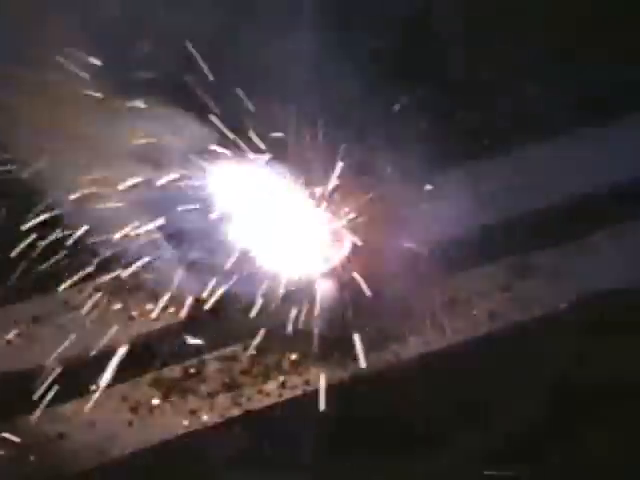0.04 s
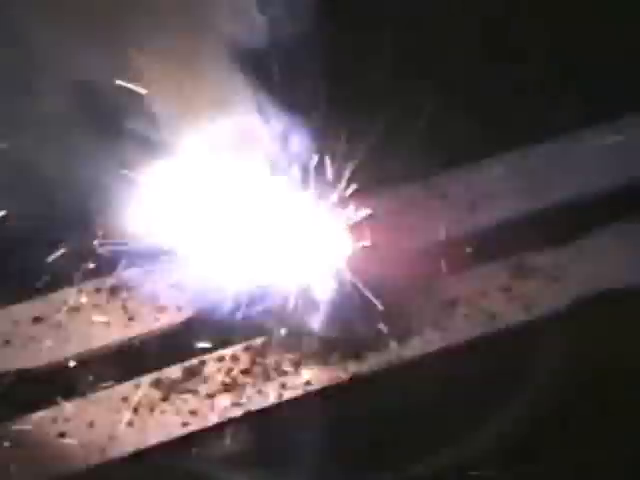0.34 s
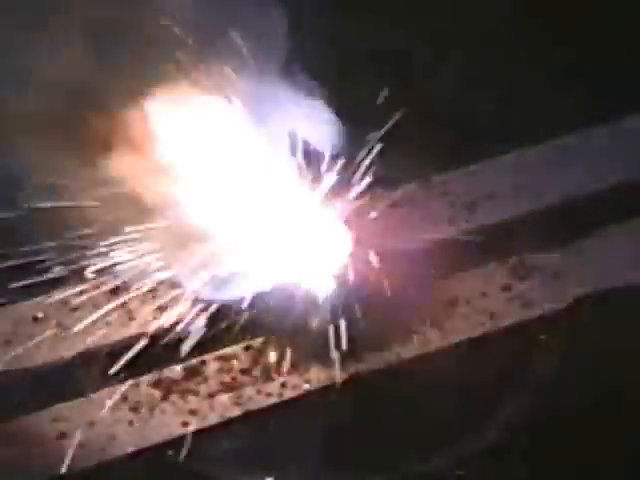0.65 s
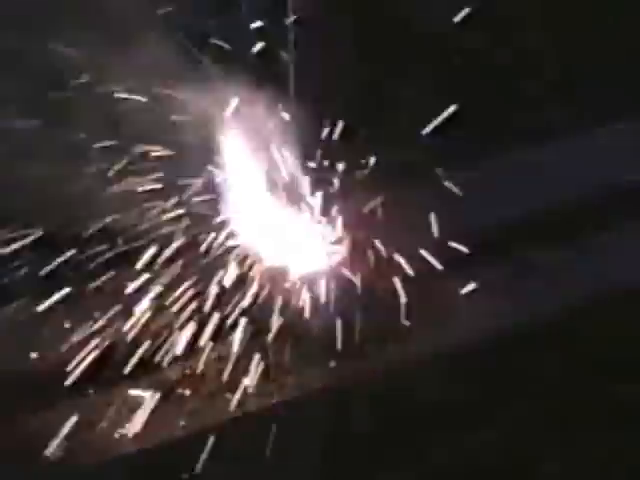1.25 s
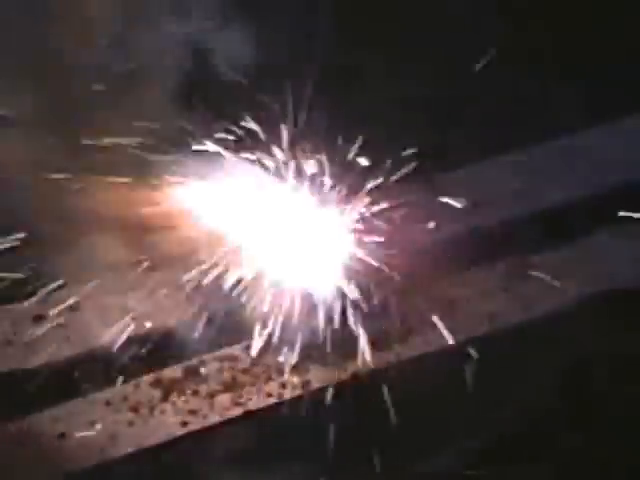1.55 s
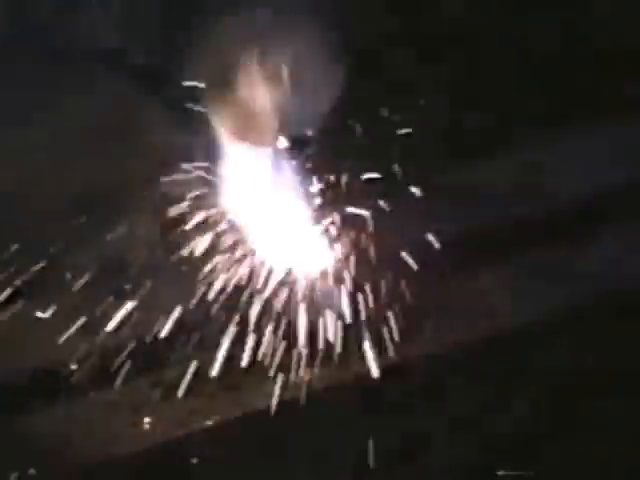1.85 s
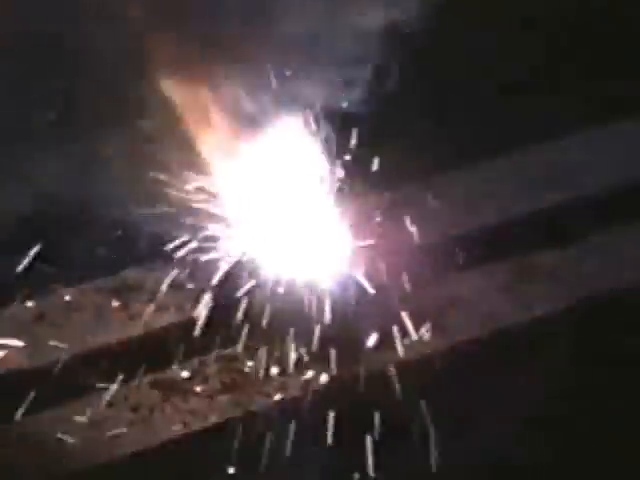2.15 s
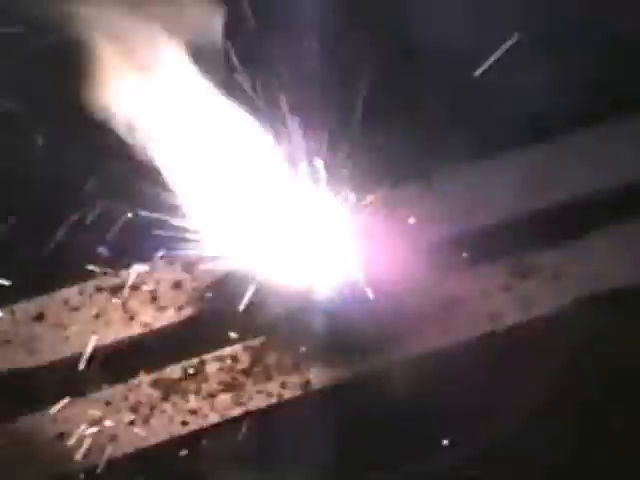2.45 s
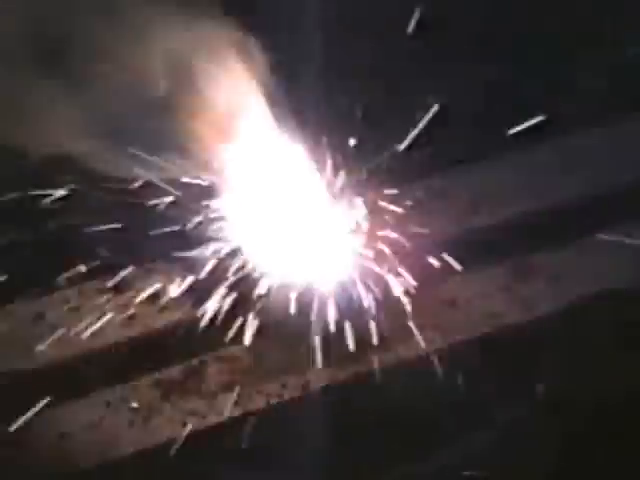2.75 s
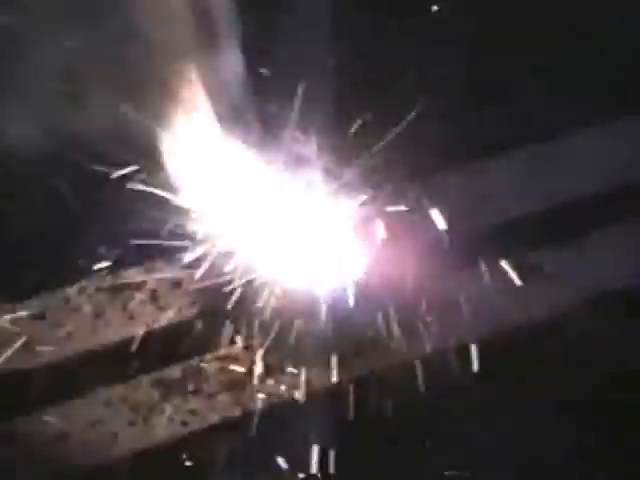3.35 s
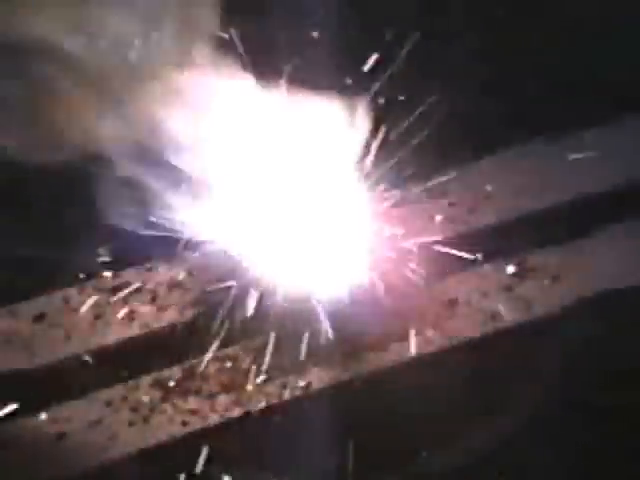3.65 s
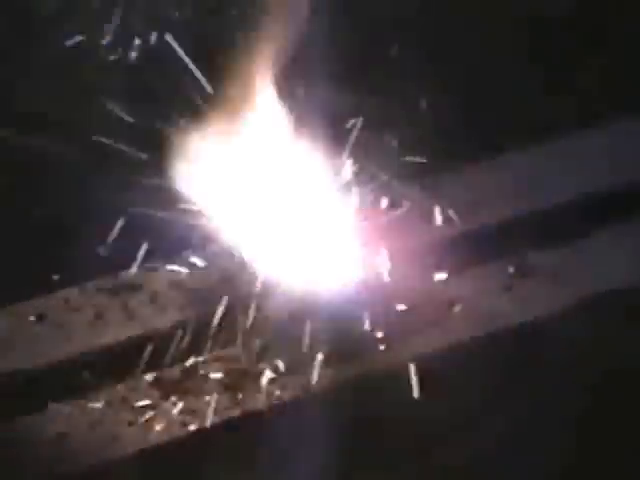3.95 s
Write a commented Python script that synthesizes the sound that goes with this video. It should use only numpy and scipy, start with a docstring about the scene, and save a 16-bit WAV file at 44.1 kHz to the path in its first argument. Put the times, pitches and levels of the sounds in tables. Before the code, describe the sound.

Burning thermite hisses and rushes close by outdoors, surging unevenly over a fine crackle of sparks. Tiny squeaky pops come at about 0.6, 1.1 and 1.3 seconds, and the melt gives a few brief gulps. Sharp spurts of hiss recur from 1 second, strongest near 2.8 and 3.2. The hiss grows louder and swishes toward 4 seconds. A faint hum and high whine lie underneath.

```python
"""Outdoors, on a steel rail, thermite burns. Gas leaves the melt in uneven surges: a midrange rush, a broad
hiss and sharp spurts from narrow vents. Sparks crackle, bubbles gulp in the melt and a few gas pockets burst
with a squeak. The hiss swishes as the flame leans; rails colour it and nearby surfaces echo. A camcorder close
by adds its hum and whine, and overloads on the loudest pops."""
import sys
import numpy as np
from scipy import signal
from scipy.fft import rfft, irfft
from scipy.io import wavfile

SR = 44100
rng = np.random.default_rng(int(sys.argv[2]) if len(sys.argv) > 2 else 0)


def generate_wav(signal):
    """Clip the signal to [-1, 1] and save it as 16-bit WAV at the path in sys.argv[1]."""
    frames = np.transpose(np.atleast_2d(signal))
    scaled = np.clip(frames, -1, 1) * 32767
    pcm = np.round(scaled).astype(np.int16)
    wavfile.write(sys.argv[1], SR, pcm)


N = 176400


def from_db(db):
    """Decibels to gain."""
    return 10 ** (np.asarray(db) / 20)


def unit_rms(x):
    """Scale to an rms of 1."""
    return x / np.sqrt(np.mean(x ** 2) + 1e-20)


def in_time(rows):
    """Rows of (seconds, value), interpolated at every sample."""
    return np.interp(np.arange(N) / SR, *np.transpose(rows))


def at_hz(rows, hz):
    """Rows of (Hz, value), interpolated on a log frequency axis."""
    points_hz, values = np.transpose(rows)
    return np.interp(np.log(hz), np.log(points_hz), values)


def bin_hz():
    """Frequencies of a full-length spectrum."""
    return np.maximum(np.arange(N // 2 + 1) * SR / N, 1)


def shaped_noise(spectrum):
    """Unit-rms noise shaped by rows of (Hz, dB)."""
    return unit_rms(irfft(rfft(rng.standard_normal(N)) * from_db(at_hz(spectrum, bin_hz())), N))


def drift(rate_hz):
    """Smooth random motion, rms about 1."""
    hop, settle = 40, 2000
    pole = np.exp(-2 * np.pi * rate_hz * hop / SR)
    white = rng.standard_normal(N // hop + settle + 2)
    slow = signal.lfilter([1], [1, -2 * pole, pole * pole], white)[settle:]
    return np.interp(np.arange(N) / hop, np.arange(len(slow)), unit_rms(slow))


def resonate(x, hz, width_hz):
    """Two-pole resonance, unity gain at the peak."""
    r = np.exp(-np.pi * width_hz / SR)
    feedback = [1, -(1 + r * r) * np.cos(2 * np.pi * hz / SR), r * r]
    return signal.lfilter(np.array([1, 0, -1]) * (1 - r * r) / 2, feedback, x + 1e-18)


def band_noise(samples, hz, width_hz):
    """Unit-rms noise through two equal resonances."""
    once = resonate(rng.standard_normal(samples), hz, width_hz)
    return unit_rms(resonate(once, hz, width_hz))


def phase_wander(samples, width_hz):
    """Random phase walk that roughens a tone to the given line width."""
    return np.cumsum(rng.standard_normal(samples)) * np.sqrt(2 * np.pi * width_hz / SR)


def delayed(x, lag_s):
    """Fractional delay."""
    n = np.arange(N)
    return np.interp(n - SR * lag_s, n, x)


# Gas surges. Each row: time in seconds, flow level in dB.
GAS_FLOW = [(0.0, -16.5), (0.2, -17.5), (0.31, -16), (0.47, -28.5), (0.51, -12.5), (0.63, -21.5),
            (0.65, -27), (0.71, -21), (0.73, -26), (0.76, -13.5), (0.85, -17.5), (0.88, -27.5), (0.92, -26),
            (0.95, -21), (1.05, -14.5), (1.19, -23.5), (1.32, -11.5), (1.38, -19.5), (1.43, -22),
            (1.47, -15.5), (1.49, -21.5), (1.53, -14), (1.57, -18), (1.65, -10.5), (1.8, -21), (1.89, -14),
            (1.95, -10), (1.99, -22.5), (2.05, -25.5), (2.09, -19.5), (2.1, -24), (2.15, -12.5),
            (2.21, -12.5), (2.24, -18), (2.45, -12.5), (2.54, -21), (2.62, -12), (2.65, -6), (2.67, -13),
            (2.7, -11.5), (2.73, -21), (2.75, -20), (2.82, -8.5), (2.9, -13), (2.99, -13.5), (3.05, -11),
            (3.12, -25.5), (3.152, -20.5), (3.16, -8), (3.24, -8), (3.32, -15), (3.4, -8.5), (3.48, -17.5),
            (3.58, -10.5), (3.66, -12.5), (3.78, -11.5), (3.82, -6), (3.9, -13), (3.94, -4.5), (4.0, -11)]


def gas_flow():
    """Surging, fluttering outflow from the melt, in dB about its mean."""
    mean_db, flutter_db = -14, 0.98
    return in_time(GAS_FLOW) - mean_db + flutter_db * drift(rate_hz=82)


# Hiss spectrum at mean flow. Each row: frequency in Hz, relative density in dB.
HISS_SPECTRUM = [(250,-24),(520,-16.5),(740,-6),(1000,-3),(1700,-2),(2700,-3.5),(4500,-2.5),(6500,0),(8500,-1.1),(10500,-4),(12000,-12),(14000,-16.5),(15500,-27)]
# Coupling of hiss to flow. Each row: frequency in Hz, share of the flow's dB swing.
FLOW_COUPLING = [(400,0.33),(900,0.71),(1800,0.82),(4500,1)]
# Low rush against the rest of the hiss. Each row: time in seconds, gain in dB.
RUSH_GAIN = [(0,-0.5),(.55,0),(1.05,1.5),(1.5,-2),(1.75,0.5),(2.6,-2),(3.05,-1.5),(3.19,-3.5),(3.38,1),(3.58,-1.5),(3.7,1.5),(3.83,-4.5),(4,-2.5)]
# Top treble against the rest of the hiss. Each row: time in seconds, gain in dB.
TREBLE_GAIN = [(0,-2.5),(.24,0),(.35,-2.5),(.78,2),(1.03,0.5),(1.5,1),(2.15,-0.5),(2.45,-3),(2.84,-3.5),(3.19,0),(3.5,-3),(3.62,2),(3.7,-4),(3.82,-0.5),(3.89,-3),(3.97,3)]


def gas_hiss(flow_db, bands=22):
    """Turbulent gas: the treble follows the flow closely, the low rush trails, each band flickers."""
    level_db, flicker_db, swirl_db = -13, 0.98, 1.3
    rush_lag_s, swirl_from_hz = 0.0055, 5500
    rush_fade_hz, treble_fade_hz = [1290, 3200], [6000, 10300]
    rush_db, treble_db = in_time(RUSH_GAIN), in_time(TREBLE_GAIN)
    spectrum = rfft(shaped_noise(HISS_SPECTRUM))
    centres_hz = np.linspace(np.sqrt(250), np.sqrt(15500), bands) ** 2
    out = np.zeros(N)
    for hz, weights in zip(centres_hz, np.eye(bands)):
        band = irfft(spectrum * np.interp(bin_hz(), centres_hz, weights), N)
        rush_share = np.interp(hz, rush_fade_hz, [1, 0])
        treble_share = np.interp(hz, treble_fade_hz, [0, 1])
        gain_db = at_hz(FLOW_COUPLING, hz) * delayed(flow_db, rush_share * rush_lag_s)
        gain_db += rush_share * rush_db + treble_share * treble_db
        gain_db += swirl_db * (hz > swirl_from_hz) * drift(rate_hz=7)
        gain_db += flicker_db * drift(rate_hz=33)
        out += band * from_db(gain_db)
    return from_db(level_db) * out


def sparks(flow_db, bands=12):
    """Tiny droplets snap off at random, denser and louder as the flow rises."""
    level_db, spread_db, flow_share = -29, 5.2, 0.55
    rate_per_s = 550 * from_db(flow_db / 2)
    sizes = from_db(spread_db * np.minimum(rng.exponential(1, N), 4))
    signs = rng.choice([-1, 1], N)
    clicks = sizes * signs * (rng.random(N) < rate_per_s / SR)
    band_of_click = rng.integers(0, bands, N)
    snaps = sum(resonate(clicks * (band_of_click == k), hz, width_hz=hz / 2) / np.sqrt(hz)
                for k, hz in enumerate(np.geomspace(1100, 9500, bands)))
    softened = signal.sosfilt(signal.butter(3, 10500, fs=SR, output="sos"), snaps)
    return unit_rms(softened) * from_db(level_db + flow_share * flow_db)


# Motor hum partials. Each row: frequency in Hz, rms level in dB.
MOTOR_HUM = [(45,-36.5),(162,-52.5),(184,-50),(270,-52),(400.5,-52.5)]


def camcorder_tones(whine_hz=15734, whine_db=-49):
    """Steady motor hum and scan whine."""
    t = np.arange(N) / SR
    return sum(np.sqrt(2) * from_db(db) * np.sin(2 * np.pi * (hz * t + rng.random()))
               for hz, db in MOTOR_HUM + [(whine_hz, whine_db)])


# Background spectrum. Each row: frequency in Hz, relative density in dB.
FLOOR_SPECTRUM = [(20,-10),(55,-1.5),(110,3),(200,3),(330,-2.5),(400,5),(480,-12.5),(1000,-13),(4000,-12.5),(15000,-24)]


def noise_floor(level_db=-38):
    """Steady, dull background noise."""
    return from_db(level_db) * shaped_noise(FLOOR_SPECTRUM)


# Peaks and dips from rails and sleepers. Each row: centre in Hz, nominal width in Hz, gain in dB.
RAIL_BANDS = [(1470,110,-5.5),(1716,360,3.5),(2040,130,-8.5),(2399,359,3),(3120,300,-4),(3588,240,3.5),(4194,287,-4),(4430,55,7.5),(4672,257,2.5),(4919,59,-5.5),(5580,66,-4.5),(5848,110,5.5),(6620,204,2.2)]
# Echoes off nearby surfaces. Each row: delay in seconds, linear gain.
NEAR_ECHOES = [(.0029,-.045),(.005154,.09),(.005936,.06),(.00992,.07),(.010172,.06)]


def rail_colour(x):
    """The track around the flame adds fixed peaks and dips; nearby surfaces echo."""
    for hz, width_hz, gain_db in RAIL_BANDS:
        gain = from_db(gain_db)
        x = x + (gain - 1) * resonate(x, hz, width_hz / np.sqrt(gain))
    return x + sum(gain * delayed(x, lag_s) for lag_s, gain in NEAR_ECHOES)


def scatter(x):
    """A short, slightly dull spray of echoes from things nearby."""
    level_db, onset_s, t60_s, cutoff_hz = -13, 0.008, 0.062, 14000
    t = np.arange(SR // 5) / SR
    echoes = rng.standard_normal(len(t)) * from_db(-60 * t / t60_s) * (t > onset_s)
    dulled = signal.sosfilt(signal.butter(1, cutoff_hz, fs=SR, output="sos"), x)
    return from_db(level_db) * signal.fftconvolve(dulled, echoes / np.linalg.norm(echoes))[:N]


# Bubbles in the melt. Each row: start in seconds, peak level in dB, starting pitch in Hz.
BUBBLE_GULPS = [(.066,-13,1153),(.236,-15,1240),(1.35,-17.5,870),(1.371,-19.5,966),(2.113,-19,970),(3.05,-15,1180)]


def bubble_gulps(rise_s=0.0029, glide_hz_per_s=4700):
    """A large bubble opens: a short, rough note that rises a little."""
    out, t = np.zeros(N), np.arange(SR // 10) / SR
    envelope = t / rise_s * np.exp(1 - t / rise_s)
    for start_s, db, hz in BUBBLE_GULPS:
        phase = 2 * np.pi * (hz + glide_hz_per_s * t / 2) * t + phase_wander(len(t), width_hz=38)
        start = int(start_s * SR)
        out[start:start + len(t)] += from_db(db) * envelope * np.sin(phase)
    return out


# Gas spurts. Each row: peak time in seconds, level in dB, centre in Hz, Gaussian sigma in seconds.
VENT_SPURTS = [(0.073,-24,12600,.04),(1.04,-19.5,7140,0.058),(1.317,-15,6240,0.028),(1.464,-16,7700,0.016),(1.52,-16,6700,.02),(1.666,-14.5,8100,0.019),(1.92,-18.5,3400,0.036),(2.172,-15.5,7300,0.048),(2.617,-15,6400,0.03),(2.813,-12.5,6000,0.019),(3.209,-10.5,6640,0.034),(3.574,-12,7100,0.013)]


def vent_spurts():
    """A narrow vent opens and closes: a swell of sharp hiss around one pitch."""
    out, t = np.zeros(N), np.arange(N) / SR
    for peak_s, db, hz, sigma_s in VENT_SPURTS:
        swell = np.exp(-((t - peak_s) / sigma_s) ** 2 / 2)
        out += from_db(db) * swell * band_noise(N, hz, width_hz=1900)
    return out


# Bursting gas pockets. Each row: start in seconds, level in dB, pitch in Hz, hold in seconds.
POCKET_POPS = [(0.6273,-5,11860,.0014),(0.6276,-1,9400,0.0021),(.633,-6.5,9480,0.0049),(0.6366,-2,9570,.0014),(0.659,-16,9500,0.0024),(1.0803,-5,11600,0.0011),(1.342,-5,11000,.001),(1.3435,-2,8400,0.0019)]


def pocket_pops(attack_s=0.0001, release_s=0.00098, crack_db=-24):
    """Each pocket vents in a few milliseconds: a rough, high squeak with a small crack."""
    out, t = np.zeros(N), np.arange(SR // 20) / SR
    for start_s, db, hz, hold_s in POCKET_POPS:
        squeak = np.sin(2 * np.pi * hz * t + phase_wander(len(t), width_hz=150))
        crack = from_db(crack_db) * band_noise(len(t), hz, width_hz=3500)
        envelope = np.minimum(t / attack_s, 1) * np.exp(-np.maximum(t - hold_s, 0) / release_s)
        start = int(start_s * SR)
        out[start:start + len(t)] += from_db(db) * envelope * (squeak + crack)
    return out


# Sliding notches. Each row: start in seconds, length in seconds, first centre in Hz, last centre in Hz.
LEAN_NOTCHES = [(1.55,0.35,6940,6100),(2.827,0.19,7100,6960),(3.294,.21,11300,5600),(3.51,0.22,10100,5400),(3.706,0.27,6800,8200)]


def flame_lean(x, depth_db=-10.5, width_hz=1200):
    """As the flame leans, a notch opens in the hiss, slides and closes: a phasing swish."""
    t = np.arange(N) / SR
    lowpass = signal.butter(1, width_hz / 2, fs=SR, output="sos")
    for start_s, length_s, from_hz, to_hz in LEAN_NOTCHES:
        progress = np.clip((t - start_s) / length_s, 0, 1)
        centre_hz = from_hz + (to_hz - from_hz) * progress
        carrier = np.exp(2j * np.pi * np.cumsum(centre_hz) / SR)
        band = 2 * np.real(signal.sosfilt(lowpass, x / carrier) * carrier)  # moving band-pass
        opening = 2 * np.sqrt(progress * (1 - progress))
        x = x - (1 - from_db(depth_db)) * opening * band
    return x


def scene():
    """One gas flow drives hiss and sparks; spurts, pops and gulps join them. Mono on two channels."""
    flow_db = gas_flow()
    flame = flame_lean(gas_hiss(flow_db) + sparks(flow_db))
    fire = rail_colour(flame + vent_spurts()) + pocket_pops() + bubble_gulps()
    return np.tile(fire + scatter(fire) + camcorder_tones() + noise_floor(), (2, 1))


def record(dry):
    """Camcorder overload flattens the loudest peaks; a steep low-pass cuts the top."""
    ceiling, knee, cutoff_hz = 0.96, 7.5, 15770
    flattened = dry / (1 + np.abs(dry / ceiling) ** knee) ** (1 / knee)
    return signal.sosfilt(signal.ellip(12, 0.1, 80, cutoff_hz, fs=SR, output="sos"), flattened)


dry = scene()
out = record(dry)
generate_wav(out)
```